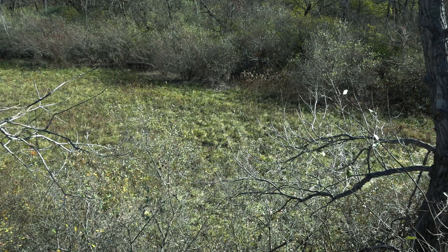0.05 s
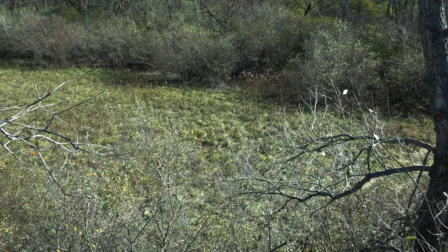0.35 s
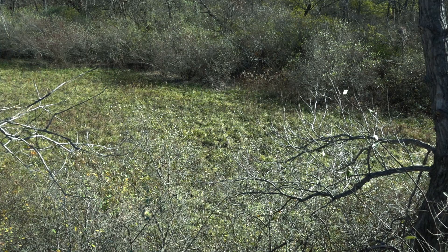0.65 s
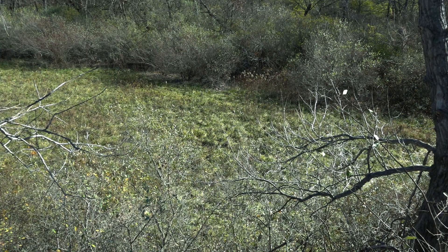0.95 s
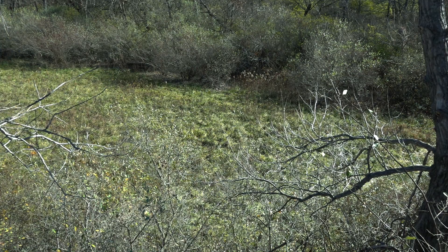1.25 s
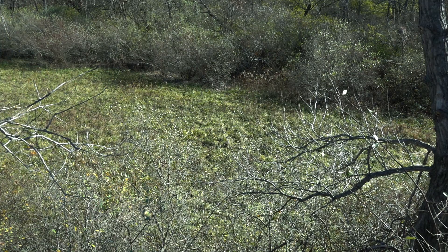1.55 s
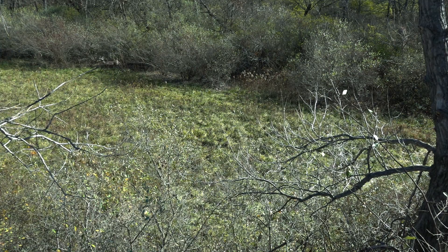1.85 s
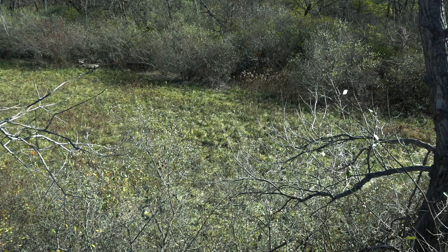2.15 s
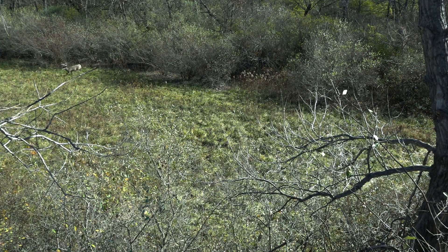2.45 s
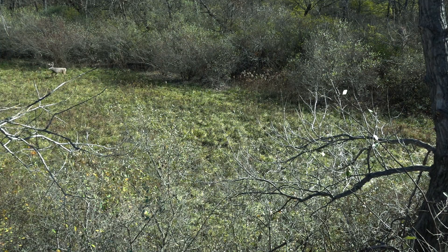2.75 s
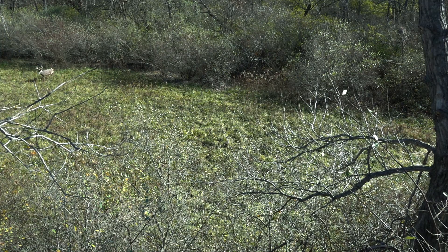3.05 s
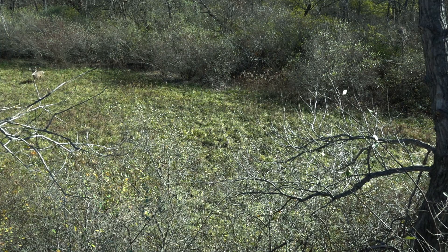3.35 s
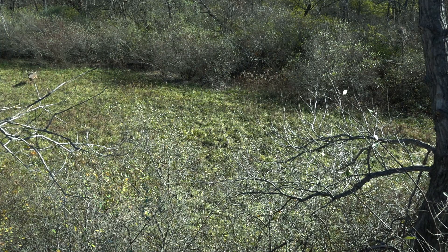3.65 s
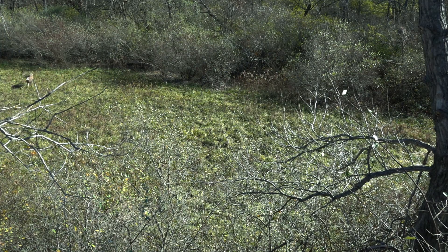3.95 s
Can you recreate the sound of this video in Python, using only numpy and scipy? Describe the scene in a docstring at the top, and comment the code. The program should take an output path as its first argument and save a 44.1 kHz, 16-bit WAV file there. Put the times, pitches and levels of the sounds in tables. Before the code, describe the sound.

Close, dry brush swishes and crackles beside an open clearing, strongest at first, when a short hollow groan sounds, then sparser. Twigs snap and undergrowth scuffs while gusts thump the microphone and air rushes faintly far away.

```python
"""Dry brush rustling close to the microphone, at the edge of a clearing.
Stems sweep past each other in swishes of tiny leaf ticks, twigs snap and the undergrowth scuffs.
The rustle is strongest at first, with a brief hollow groan in it, then thins out.
Wind buffets and thumps the microphone; far off lie a low rush of air, a rumble and a faint drone."""
import sys
import numpy as np
from scipy import signal
from scipy.fft import rfft, irfft
from scipy.io import wavfile
from scipy.ndimage import uniform_filter1d

SR = 44100
rng = np.random.default_rng(int(sys.argv[2]) if len(sys.argv) > 2 else 0)


def transcribe(u):
    """Save the signal u as a 16-bit wav file named by the first command-line argument.

    u: samples, shape (n,) or (channels, n), limited to [-1, 1]; the rate is SR.
    q: integer samples, one column per channel.
    """
    v = np.clip(np.atleast_2d(u).T, -1, 1)
    q = np.round(v * 32767).astype(np.int16)
    wavfile.write(sys.argv[1], SR, q)


N = 176400

# steady rustle of the nearby brush (time [s], level [dB])
RUSTLE_LEVEL = [(0, -37.5), (.16, -33), (.2, -37.5), (.29, -34), (.55, -36), (.8, -36), (1.04, -37),
                (1.31, -39), (1.34, -48.5), (1.48, -38.5), (1.6, -63), (1.95, -44.5), (2.2, -47),
                (2.55, -46), (2.7, -45.5), (3.0, -44.5), (3.3, -49), (3.65, -54), (4, -45)]
# swishes of stems (time of the height [s], length [s], level [dB], relative treble [dB])
STEM_SWISHES = [(0.008, 0.071, -29.5, 1), (0.076, 0.012, -24, -2), (0.314, 0.011, -28.5, -21),
                (0.429, 0.041, -27.5, 12), (0.495, 0.04, -31.5, 7.5), (0.567, 0.076, -27, -21),
                (0.68, 0.063, -31, -2), (0.79, 0.048, -30.5, 0), (0.973, 0.061, -37, 9),
                (1.323, 0.026, -56, -22), (1.47, 0.023, -40.5, 5), (1.521, 0.018, -29.5, 4),
                (1.57, 0.011, -30.5, 1), (1.592, 0.081, -31.5, 5), (1.695, 0.042, -29.5, 6.5),
                (1.752, 0.046, -31, 8), (1.852, 0.14, -34.5, 7), (2.087, 0.11, -38.5, 3.5),
                (2.32, 0.11, -41, 6), (2.503, 0.11, -48, 14), (2.784, 0.063, -38.5, 3.5),
                (2.956, 0.081, -44.5, 17.5), (3.169, 0.06, -47, 17.5), (3.231, 0.073, -38, 11),
                (3.369, 0.041, -38.5, 10.5), (3.515, 0.15, -41.5, 10), (3.684, 0.061, -46, 14),
                (3.823, 0.15, -44.5, 9.5), (3.893, 0.026, -43, 12.5)]
# colour of the rustle as the microphone picks it up (frequency [Hz], relative level [dB])
RUSTLE_COLOUR = [(300, -40), (700, -7.5), (1100, -6.5), (1650, -1.5), (2050, -5), (2700, 0.5), (3350, 2),
                 (3850, -3.5), (4400, -3), (5500, -6.5), (6400, -18), (9000, -21), (15000, -25)]
# brighter colour of the leaf tips (frequency [Hz], relative level [dB])
TIP_COLOUR = [(2000, -23), (5000, 5), (7700, 2), (9500, 1), (12500, -2.5), (15800, -15)]
# rush of air in the far trees (time [s], level [dB])
FAR_RUSH_LEVEL = [(0, -31.5), (.14, -32.5), (.2, -38), (.8, -40), (1.2, -41.5), (1.4, -44), (1.9, -43),
                  (2.3, -46), (3.0, -44.5), (3.5, -43.5), (4, -48.5)]
# colour of that rush (frequency [Hz], relative level [dB])
FAR_RUSH_COLOUR = [(100, -1), (200, -0.5), (400, 0.5), (520, 1), (700, -2.5), (950, -14), (1500, -14.5),
                   (2500, -12.5), (6000, -45)]
# colour of the distant rumble (frequency [Hz], relative level [dB])
RUMBLE_COLOUR = [(20, 6.5), (55, -4), (100, 5.5), (170, -6.5), (260, -14), (600, -38)]
# tones of the distant drone (frequency [Hz], width [Hz], level [dB])
DRONE_TONES = [(99.4, 8.2, -49.5), (129.3, 9.1, -50.5), (147.2, 4.3, -52)]
# gusts on the microphone (time [s], relative level [dB])
GUST_LEVEL = [(0.0, -19.5), (.17, -15), (0.25, -20), (.5, -20.5), (0.62, -15), (0.74, -17), (.93, -22),
              (1.15, -35.5), (1.32, -16.5), (1.58, -16), (1.73, -30), (1.93, -27.5), (2.25, -14.5),
              (2.42, -32.5), (2.55, -23.5), (2.72, -38.5), (3.0, -33), (3.06, -27), (3.35, -20),
              (3.48, -35.5), (3.61, -20.5), (3.92, -20.5), (4.0, -24)]
# colour of wind on the microphone (frequency [Hz], relative level [dB])
GUST_COLOUR = [(3, -5.5), (9, -6.5), (15, 1.5), (22, -12), (30, -12.5), (40, -22), (52, -22.5), (80, -40),
               (130, -54), (250, -52), (600, -133)]
# course of the hollow groan (time [s], pitch [Hz], level [dB])
GROAN_COURSE = [(0, 409.3, -48), (.06, 472, -41), (.12, 450.5, -38), (.165, 438, -31.5), (.195, 444, -52),
                (.26, 493.5, -43), (.36, 449, -37), (.43, 450, -80)]
# snapping twigs (time [s], relative level [dB], ring [Hz], relative treble [dB], tear decay [s])
TWIG_SNAPS = [(0.0576, -8.5, 1500, -27, 0.0063), (.286, -12, 2650, -41, 0.0028),
              (0.3859, -8, 2890, -16.5, 0.0018), (0.412, -8, 2640, -17, 0.0026),
              (0.4121, -2, 5100, -21, 0.0034), (0.4385, -9.5, 3540, -15, 0.009),
              (0.677, -14, 3740, -28, 0.0023), (0.7832, -8.5, 2660, -28, 0.0041),
              (1.0755, -10, 2740, -43, 0.0042), (1.5112, -14.5, 2750, -58, 0.0022),
              (1.5133, -12.5, 4430, -29, 0.0072), (1.562, -20, 2070, -15, 0.0088),
              (1.6943, -9.5, 2050, -28, 0.0027), (1.7645, -7.5, 3250, -39, 0.0022),
              (2.045, -20.5, 2640, -22, 0.0033), (2.1098, -21.5, 4200, -8.5, 0.003),
              (2.217, -24, 2980, -38, 0.0025), (2.486, -19, 3000, -10.5, 0.0043),
              (2.655, -27, 2500, -27, 0.0032), (2.683, -27, 1400, -13, 0.0031),
              (2.839, -16.5, 2120, -33, .002), (2.857, -28.5, 3670, -5, 0.031),
              (2.874, -21.5, 1150, -16, 0.003), (2.931, -23.5, 3340, -6, 0.0034),
              (2.9342, -14, 4230, -2, 0.0025), (3.114, -26, 2350, -8, 0.0035),
              (3.674, -26, 4460, -3, 0.0063), (3.8301, -15, 3420, -28, 0.0016)]
# scuffs in the undergrowth (time of the height [s], length [s], level [dB], centre [Hz])
UNDERGROWTH_SCUFFS = [(0.067, 0.073, -31, 1180), (0.241, .012, -29, 1590), (0.264, 0.023, -31.5, 312),
                      (0.439, 0.034, -33, 200), (1.758, 0.034, -43, 230), (2.087, 0.024, -40, 684),
                      (2.795, 0.044, -40, 600), (2.813, 0.025, -36.5, 232), (3.077, 0.05, -42.5, 810),
                      (3.442, 0.024, -40, 577), (3.964, 0.1, -43, 530)]
# single eddies on the microphone (time [s], peak level [dB], frequency [Hz])
EDDY_THUMPS = [(0.597, -25, 36), (0.817, -20, 39.7), (1.58, -14.5, 35.4), (2.212, -17, 32.3),
               (2.321, -24, 32.4), (3.042, -13, 34.7), (3.232, -26, 64.6)]


def undb(db):
    """Decibels to gain."""
    return 10 ** (np.asarray(db) / 20)


def unit(x):
    """Scale to rms 1."""
    return x / np.sqrt(np.mean(x ** 2) + 1e-18)


def curve(rows):
    """Join (time, value) rows with straight lines."""
    return np.interp(np.arange(N) / SR, *np.array(rows).T)


def colour(x, points):
    """Causal filter through (frequency [Hz], level [dB]) points; white noise keeps its level."""
    hz, db = np.array(points, float).T
    bins_hz = np.maximum(np.arange(N // 2 + 1) * SR / N, 1)
    gain = unit(undb(np.interp(np.log(bins_hz), np.log(hz), db)))
    cepstrum = irfft(np.log(gain), N)
    cepstrum[1:N // 2] *= 2  # fold to minimum phase
    cepstrum[N // 2 + 1:] = 0
    return irfft(rfft(x) * np.exp(rfft(cepstrum)), N)


def resonate(x, hz, width_hz):
    """Pass twice through one resonance and scale to rms 1."""
    b, a = signal.iirpeak(hz, hz / width_hz, fs=SR)
    return unit(signal.lfilter(b, a, signal.lfilter(b, a, x)))


def walk(rate_hz):
    """Smooth random wander with spread 1."""
    hold = int(SR / rate_hz)
    steps = np.repeat(rng.standard_normal(N)[:N // hold + 1], hold)
    return unit(uniform_filter1d(steps, hold)[:N])


def die_away(impulses, decay_s):
    """Give each impulse an exponential tail."""
    return signal.lfilter([1], [1, -np.exp(-1 / (decay_s * SR))], impulses)


def leaf_ticks(per_s=5000, scatter_db=3.5, hiss_share=0.45):
    """Dense leaf ticks of scattered size, the far ones blurred to a hiss."""
    hits = rng.random(N) < per_s / SR
    size = undb(scatter_db * np.minimum(rng.exponential(size=N), 6))
    near = unit(hits * size * rng.choice([-1, 1], N))
    return np.sqrt(1 - hiss_share) * near + np.sqrt(hiss_share) * rng.standard_normal(N)


def crackle_gain(db, per_s=60, scatter_db=3.5):
    """Leaves catch and let go: short spurts with a sudden start lift the rustle."""
    caught = rng.random(N) < per_s / SR
    size = undb(db + scatter_db * np.minimum(rng.exponential(size=N), 2.5))
    return unit(np.sqrt(1 + die_away(caught * size ** 2, decay_s=0.0025)))


def leaf_pops(per_s=40):
    """Lone, very short crackles of dry leaves that stand out of the ticks."""
    power = (rng.random(N) < per_s / SR) * rng.exponential(size=N)
    return undb(10) * np.sqrt(die_away(power, decay_s=.0009)) * rng.standard_normal(N)


def brush(rise_share=0.45):
    """Close by, stems and leaf tips tick in a steady rustle and in swishes that swell and fade."""
    t = np.arange(N) / SR
    stem_power = undb(curve(RUSTLE_LEVEL)) ** 2
    tip_power = stem_power * undb(-10) ** 2
    for at, length, db, treble_db in STEM_SWISHES:
        slope_s = length * np.where(t < at, rise_share, 1 - rise_share)
        swish_power = undb(db) ** 2 * np.exp(-((t - at) / slope_s) ** 2)
        stem_power += swish_power
        tip_power += swish_power * undb(treble_db - 14) ** 2
    flutter = undb(0.87 * walk(rate_hz=45.02))  # leaves tremble
    tips = unit(leaf_ticks() * crackle_gain(db=-6.5) + leaf_pops()) * np.sqrt(tip_power)
    stems = leaf_ticks() * crackle_gain(db=-0.5) * np.sqrt(stem_power)
    return colour(stems * flutter, RUSTLE_COLOUR) + colour(tips * flutter, TIP_COLOUR)


def boughs(growth=1.71):
    """Thicker branches add a woody mid rustle that comes forward when the brush is stirred hard."""
    stir = unit(undb(growth * curve(RUSTLE_LEVEL)))
    return undb(-42.5) * stir * resonate(leaf_ticks(), hz=1040, width_hz=1970)


def distant_air():
    """Air rushes through the far trees with one wavering hollow resonance, over a steady rumble."""
    rush = colour(rng.standard_normal(N), FAR_RUSH_COLOUR) * undb(.6 * walk(rate_hz=13))
    hollow = resonate(rng.standard_normal(N), hz=470.3, width_hz=40.6)
    hollow *= undb(-12.5 + 6.5 * walk(rate_hz=13))
    rumble = undb(-40.5) * colour(rng.standard_normal(N), RUMBLE_COLOUR)
    return (rush + hollow) * undb(curve(FAR_RUSH_LEVEL)) + rumble


def distant_drone():
    """A few faint, low tones that waver, far away."""
    return sum(undb(db) * resonate(rng.standard_normal(N), hz, width) for hz, width, db in DRONE_TONES)


def wind_buffeting():
    """Eddies push on the microphone; their strength follows the gusts."""
    eddies = colour(rng.standard_normal(N), GUST_COLOUR)
    running_rms = np.sqrt(uniform_filter1d(np.abs(signal.hilbert(eddies)) ** 2 / 2, size=6000))
    return eddies / running_rms * undb(curve(GUST_LEVEL) + 6.5)


def groan(rough_share=.72, waver_hz=60):
    """A rough, hollow tone, perhaps of a bending branch, that rises, sags and swells twice."""
    pitch_hz = curve([(at, hz) for at, hz, _ in GROAN_COURSE])
    level_db = curve([(at, db) for at, _, db in GROAN_COURSE])
    roughness = walk(waver_hz) + 1j * walk(waver_hz)
    waver = np.sqrt(1 - rough_share) + np.sqrt(rough_share / 2) * roughness
    tone = np.exp(2j * np.pi * np.cumsum(pitch_hz) / SR)
    return unit(np.real(waver * tone)) * undb(level_db)


def twigs(relative_width=.3, splinter_decay_s=0.0059):
    """Each break is a sharp click and a short tearing of fibres that ring the twig, then splinters."""
    wood, crack, splinters = np.zeros((3, N))
    age = np.arange(6000) / SR
    for at, db, hz, treble_db, tear_s in TWIG_SNAPS:
        span = slice(int(at * SR), int(at * SR) + len(age))
        tear = np.exp(-age / tear_s) * rng.standard_normal(len(age))
        ring = np.exp(-np.pi * relative_width * hz * age) * np.cos(2 * np.pi * hz * age)
        fibres = signal.fftconvolve(tear, ring / np.linalg.norm(ring))[:len(age)]
        wood[span] += undb(db) * (ring + undb(-6) * fibres)
        crack[span] += undb(db + treble_db) * tear
        splinters[span] += undb(db) * np.exp(-age / splinter_decay_s)
    wood = signal.sosfilt(signal.butter(4, [600, 5800], "band", fs=SR, output="sos"), wood)
    snaps = wood + colour(crack, TIP_COLOUR)
    return undb(-4) * snaps + undb(-18.5) * colour(splinters * leaf_ticks(), RUSTLE_COLOUR)


def scuffs(relative_width=1.15):
    """Grainy, dull scrapes low in the undergrowth."""
    t, grains, out = np.arange(N) / SR, leaf_ticks(), 0
    for at, length, db, hz in UNDERGROWTH_SCUFFS:
        swell = np.exp(-2 * ((t - at) / length) ** 2)
        out += undb(db) * swell * resonate(grains, hz, hz * relative_width)
    return out


def wind_thumps():
    """A passing eddy pushes on the microphone, then pulls."""
    t, out = np.arange(N) / SR, 0
    for at, db, hz in EDDY_THUMPS:
        phase = 2 * np.pi * hz * (t - at)
        out -= undb(db) * phase * np.exp((1 - phase ** 2) / 2)
    return out


def brief_dip(at_s=1.3288, length_s=.0095, depth_db=-32):
    """A gain that makes the level dip for an instant."""
    inside = np.abs(np.arange(N) / SR - at_s) < length_s / 2
    return undb(depth_db * uniform_filter1d(inside.astype(float), size=80))


def scene():
    """Near vegetation and far air, dipping once, with the drone and the wind on a single microphone."""
    vegetation = brush() + boughs() + twigs() + scuffs() + groan()
    clearing = (vegetation + distant_air()) * brief_dip()
    return (clearing + distant_drone() + wind_buffeting() + wind_thumps())[None]


def record(dry):
    """The recorder cuts the top above 15.8 kHz."""
    return signal.sosfilt(signal.ellip(10, .2, 80, 15800, fs=SR, output="sos"), dry)


dry = scene()
out = record(dry)
transcribe(out)
```